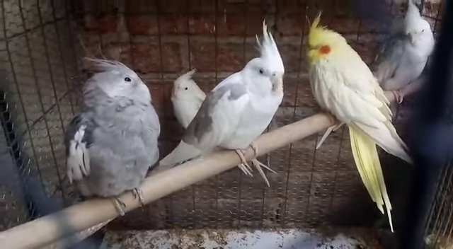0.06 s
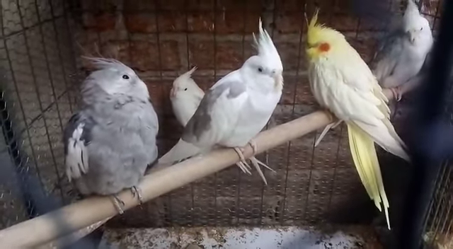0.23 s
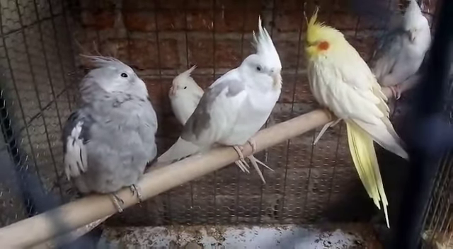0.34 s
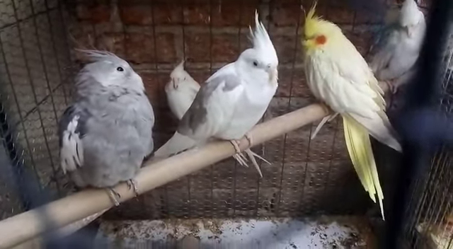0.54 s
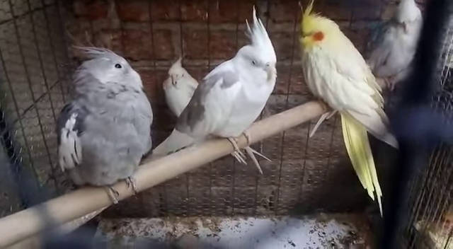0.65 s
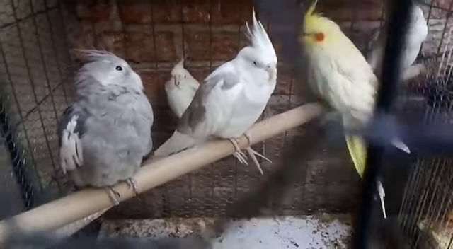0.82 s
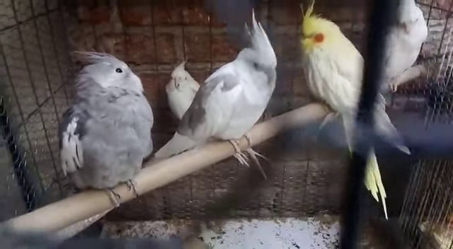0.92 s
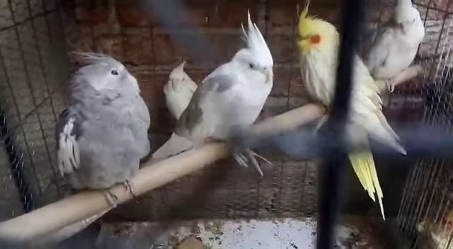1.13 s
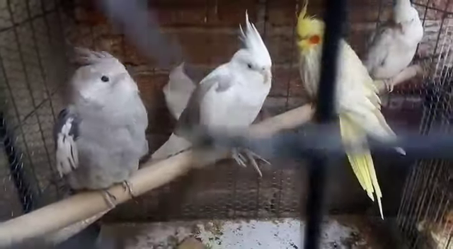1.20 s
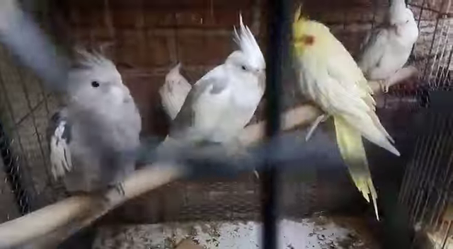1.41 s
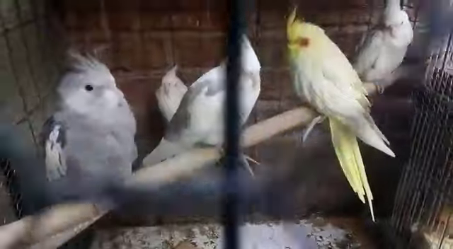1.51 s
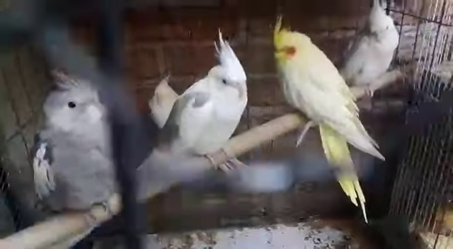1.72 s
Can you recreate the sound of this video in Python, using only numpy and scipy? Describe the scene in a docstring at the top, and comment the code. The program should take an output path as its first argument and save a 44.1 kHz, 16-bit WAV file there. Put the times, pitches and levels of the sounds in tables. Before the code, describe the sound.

Faint distant bird calls fade as a near caged bird begins short sharp chirps, growing louder and evenly spaced, then stopping; two soft wooden taps follow over quiet hum, with a short bright room ring.

```python
"""A brick room of caged cockatiels: a small bird close by gives a quick run of chirps.
Each chirp opens on a raspy low note, then breaks into a loud, warbling whistle, both built from harmonics.
Farther birds swoop down onto held notes, and light taps ring the modes of a perch.
Shaped noise and two low sines make the room noise and hum; wall echoes and decaying noise make the room."""
import sys
import numpy as np
from scipy import signal
from scipy.fft import rfft, irfft
from scipy.io import wavfile

SR = 44100
rng = np.random.default_rng(int(sys.argv[2]) if len(sys.argv) > 2 else 0)


def int16_out(signal):
    """Quantize to a 16-bit WAV file."""
    q = np.round(np.clip(np.atleast_2d(signal).T, -1, 1) * 32767)
    wavfile.write(sys.argv[1], SR, q.astype(np.int16))


N = 77175

# Room noise colour: (frequency [Hz], relative density [dB per Hz])
AIR_COLOUR = [(25, -15), (70, 9), (110, 3.5), (170, -5), (400, -7.5), (800, -9.5), (1500, -18.5),
              (3000, -5.5), (6500, -10), (7600, -49), (16000, -46)]
# Level ride of room noise and hum: (time [s], level [dB])
AIR_LEVEL = [(0, -54), (.25, -53.5), (.55, -51), (.75, -54), (1.25, -57.5), (1.42, -56.5), (1.58, -50.5),
             (1.75, -46.5)]
# Low hum: (frequency [Hz], level relative to the room noise [dB])
HUM = [(71, -9), (108, -10)]
# Farther birds, each call swooping down onto a held note: (time [s], length [s], from [Hz], to [Hz],
#   level [dB], first overtone [dB], pitch scatter [fraction of pitch])
FAR_CALLS = [ (-.02, 0.11, 3500, 3397, -36.5, -35, 0.02), (-.05, 0.087, 2875, 2550, -35, -25.5, 0.14),
             (-.03, 0.15, 2538, 2119, -50, -38, 0.14), (1.018, 0.083, 1292, 1112, -52, -33, 0.07),
             (1.047, 0.033, 1855, 1662, -44.5, -31, .04), (1.467, 0.057, 1984, 1002, -49.5, -6, 0.1),
             (1.624, 0.075, 2716, 1674, -51.5, 13.5, 0.05), (1.643, 0.052, 5050, 4400, -35.5, -23, .08), ]
# Decay of the room ring: (frequency [Hz], t60 [s])
ROOM_T60 = [(500, 0.79), (2500, 0.62), (5500, 0.3), (9000, 0.47), (15000, 0.06)]
# Colour of the room ring: (frequency [Hz], level [dB])
ROOM_COLOUR = [(700, 3), (1800, 1.5), (2800, -3.5), (4000, 2.5), (5500, -3), (8000, 0), (11000, -3.5),
               (15000, 1)]
# Near walls: (delay [s], level [dB])
ECHOES = [(.0034, -12), (.0079, -15), (0.0119, -15.5)]
# Near bird's chirps: (time of the break [s], low note length [s], whistle length [s], opening hook [Hz],
#   low note from [Hz], to [Hz], whistle from [Hz], to [Hz], warble period [s], low note [dB],
#   its swell [dB], whistle [dB], upper overtones [dB], rasp [0-1])
CHIRPS = [ (0.215, 0.015, 0.0059, 2009.5, 1610, 2876, 3880, 4130, 0.046, -18.5, 21, -27.5, -1.5, 0.12),
          (0.224, 0.0026, 0.011, -9.5, 3975, 4140, 5650, 6170, 0.038, -23.5, -9, -20, 3, 0.26),
          (0.312, 0.032, 0.0089, 7, 3386, 4140, 5720, 5560, 0.0065, -19, 9.5, -25, 0, 0.15),
          (0.384, 0.014, 0.011, 1996, 1681, 2073, 3590, 3554, 0.089, -30, -1.5, -20, -8.5, 0.39),
          (0.393, 0.0037, 0.011, -4, 3580, 4100, 5740, 5150, 0.04, -44, 7, -29, 21.5, 0.5),
          (.473, 0.012, 0.027, 1905, 1872, 2200, 3543, 4290, 0.07, -25.5, 2.5, -19.5, 1, 0.18),
          (.559, 0.016, 0.0062, 303, 2214, 2603, 3310, 3380, 0.043, -18, 7, -13, -0.5, 0.1),
          (0.564, 0.0025, .012, -11, 3487, 3450, 5090, 5680, 0.017, -22, 8, -12, 0.5, 0.68),
          (0.595, .017, 0.0221, 393.5, 3336, 3285, 5476, 4950, 0.0233, -24, -7.5, -12.5, -1.5, 0),
          (0.667, .029, 0.022, 306.5, 3095, 2783, 5695, 5460, .016, -15.5, 19.5, -11, -2.5, 0.05),
          (0.789, 0.023, .031, 2212, 2546, 2900, 5380, 5693, 0.0099, -16, 13.5, -10, -4.5, 0.36),
          (0.898, 0.015, 0.022, 697, 3007, 2728, 5396, 5603, 0.0093, -20, 1, -10.5, -4, 0.19),
          (1.005, 0.022, 0.026, -11, 2690, 2943, 5360, 5296, 0.013, -15, 14.5, -10, -3.5, 0.46),
          (1.112, 0.0166, .027, -1.5, 2410, 2800, 4655, 5572, .009, -16, 6, -10, -7, 0.08),
          (1.235, 0.027, 0.018, -9, 2438, 3220, 6420, 6480, 0.016, -41.5, -7, -22, -0.5, 0.89),
          (1.25, .002, 0.013, 12, 4940, 4800, 4640, 4660, .0095, -61, 10, -10, -6, 0.46),
          (1.35, 0.029, 0.016, -7, 2160, 3300, 4800, 5020, 0.015, -19, 5.5, -15, -4, 0.26),
          (1.459, .021, 0.015, -2.5, 2268, 2572, 4750, 5402, 0.0072, -17, 11, -12.5, 0.5, 0.36), ]
# Harmonics of the low note, from the fundamental up: (level [dB])
LOW_HARMONICS = [0.5, -4, -7, -8, -5.5, -7, -9]
# Harmonics of the whistle, from the fundamental up: (level [dB])
WHISTLE_HARMONICS = [-0.5, -8, -8.5, -35, -37, -25, -50]
# Resonance of throat and beak: (frequency [Hz], gain [dB])
THROAT = [(1500, -2.5), (2600, -4), (4000, 0), (5400, 3.5), (6500, 0.5), (8000, -19), (9700, -17.5),
          (11300, -21), (13300, -17.5), (15300, -12.5), (17000, -34)]
# Tiny rising squeaks around the chirps: (time of the peak [s], pitch there [Hz], level [dB])
SQUEAKS = [(.199, 4600, -33), (.216, 4530, -23), (0.592, 5530, -14), (.772, 4200, -19),
           (0.878, 4730, -27.5), (0.979, 4240, -29), (1.092, 4440, -25), (1.218, 2830, -17),
           (1.235, 4330, -15)]
# Light taps on the perch: (time [s], level [dB])
TAPS = [(1.553, -39), (1.593, -31)]
# Ringing modes of the perch: (frequency [Hz], level [dB], t60 [s])
PERCH_MODES = [(575, -13.5, 0.085), (1082, -4.5, 0.069), (1656, -1.5, .035), (2120, -9, 0.037),
               (5100, 7, .015)]

HUM_WAVER, HUM_WAVER_HZ = .3, 6   # spread, as a fraction of level and as radians of phase
ROOM_DB, ROOM_GAP_S = -7.5, 0.0019   # ring of the near sounds; its silent lead-in
SWOOP_S, FAR_EDGE_S = 0.013, .012
FAR_SCATTER_RATE_HZ, FAR_ROLLOFF_DB = 657, -9.5   # rolloff per overtone
ATTACK_S, RELEASE_S, BREAK_S = 0.001, 0.0013, 0.0012
HOOK_S = 0.00247   # the hook settles onto the low note
WARBLE_HZ, WARBLE_DECAY_S = 306, 0.02
WARBLE_DIP_DB = 4   # the whistle thins whenever its warble swings low
WHISTLE_SAG_DB = 5.5   # the whistle weakens after the break
BREAK_DIP_DB = 5   # the voice thins as it breaks
OVERTONES_FROM_HZ = 7040
OVERTONE_SWELL_DB = 8   # the upper overtones open up as the low note builds
RASP_SETTLE_S, RASP_HELD, BREAK_RASP = .007, .15, .5
RASP_JITTER, PITCH_JITTER, JITTER_RATE_HZ = .12, .011, 300   # jitter as a fraction of pitch
DOUBLING = .5   # strong and weak cycles alternate in the rasp
HISS_DB, HISS_TOP_HZ = -10, 7000
FLUTTER_DB, FLUTTER_HELD, FLUTTER_HZ = 4.5, .3, 160
SQUEAK_S, SQUEAK_RISE_HZ_PER_S = 0.0014, 250000
NEAR_LOW_CUT_HZ = 1640   # the near bird's sounds carry little below this
TAP_CONTACT_S = 0.0024
CUTOFF_HZ = 16100


def from_db(db):
    """Decibels to gain."""
    return 10 ** (np.asarray(db) / 20)


def rms_one(x):
    """Scale to an rms of 1."""
    return x / np.sqrt(np.mean(x ** 2) + 1e-20)


def at_hz(points, hz):
    """Read a table on a log-frequency axis."""
    f, v = np.transpose(points)
    return np.interp(np.log(np.maximum(hz, 1)), np.log(f), v)


def ramp(x):
    """Smooth step from 0 to 1."""
    return np.sin(np.pi / 2 * np.clip(x, 0, 1)) ** 2


def shaped_noise(gain, size=N):
    """Noise whose spectrum follows gain(Hz); rms 1."""
    hz = np.arange(size // 2 + 1) * SR / size
    return rms_one(irfft(rfft(rng.standard_normal(size)) * gain(hz), size))


def wander(rate_hz, size=N):
    """Random wavering, mostly below the given rate; spread 1."""
    return shaped_noise(lambda f: 1 / (1 + (f / rate_hz) ** 2), size=size)


def turn(hz):
    """Phase of an oscillator that follows a pitch curve."""
    return 2 * np.pi * np.cumsum(hz) / SR


def background(t):
    """Soft room noise and a wavering hum, rising and falling together."""
    air = shaped_noise(lambda f: from_db(at_hz(AIR_COLOUR, f)))
    hum = 0
    for hz, db in HUM:
        swell = 1 + HUM_WAVER * wander(HUM_WAVER_HZ)
        phase = 2 * np.pi * hz * t + HUM_WAVER * wander(HUM_WAVER_HZ)
        hum = hum + from_db(db) * np.sqrt(2) * swell * np.sin(phase)
    return from_db(np.interp(t, *np.transpose(AIR_LEVEL))) * (air + hum)


def room(x):
    """Diffuse ring of the room: bands of noise, each with its own colour and decay."""
    t, tail = np.arange(SR) / SR, 0
    edges = np.geomspace(200, 18000, 14)
    for low, high in zip(edges, edges[1:]):
        centre = np.sqrt(low * high)
        band_pass = signal.butter(2, [low, high], "band", fs=SR, output="sos")
        band = signal.sosfilt(band_pass, rng.standard_normal(SR))
        decay = np.exp(-np.log(1000) * t / at_hz(ROOM_T60, centre))
        tail = tail + from_db(at_hz(ROOM_COLOUR, centre)) * band * decay
    # a longer decay holds more energy, so scale by one t60
    tail = tail * ramp(t / ROOM_GAP_S - 1) * np.sqrt(2 * np.log(1000) / (SR * ROOM_T60[1][1]))
    return signal.fftconvolve(x, tail)[:len(x)]


def far_birds():
    """Falling calls from across the room, direct sound plus the room's ring."""
    lead = SR // 4   # lets calls and ring start before the scene opens
    t, out = np.arange(-lead, N) / SR, 0
    for s, length, from_hz, to_hz, db, overtone_db, scatter in FAR_CALLS:
        hz = to_hz + (from_hz - to_hz) * np.exp(-np.maximum(t - s, 0) / SWOOP_S)
        phase = turn(hz * (1 + scatter * wander(FAR_SCATTER_RATE_HZ, size=len(t))))
        voice = np.sin(phase)
        for k in range(3):
            voice = voice + from_db(overtone_db + FAR_ROLLOFF_DB * k) * np.sin((k + 2) * phase)
        gate = ramp((t - s) / FAR_EDGE_S) * ramp((s + length - t) / FAR_EDGE_S)
        out = out + from_db(db) * voice * gate
    return (out + room(out))[lead:]


def chirp(t, low_s, high_s, hook_hz, low_from, low_to, high_from, high_to, warble_s,
          low_db, swell_db, high_db, bright_db, rasp):
    """A low note, entered by a pitch hook, cracks into a warbling whistle at t = 0."""
    high = .5 + .5 * np.tanh(t / BREAK_S)   # crossfade from low note to whistle
    low = 1 - high
    after, age = np.maximum(t, 0), np.maximum(t + low_s, 0)
    early, late = np.clip(-t / low_s, 0, 1), np.clip(t / high_s, 0, 1)

    warble = np.sin(2 * np.pi * after / warble_s) * np.exp(-after / WARBLE_DECAY_S)
    low_hz = low_to + (low_from - low_to) * early + hook_hz * np.exp(-age / HOOK_S)
    high_hz = high_from + (high_to - high_from) * late + WARBLE_HZ * warble
    # roughest at the onset, with an extra crackle at the break
    onset_rasp = rasp * (RASP_HELD + rasp ** 2 + np.exp(-age / RASP_SETTLE_S))
    rough = low * (onset_rasp + BREAK_RASP * high)
    jitter = (RASP_JITTER * rough + PITCH_JITTER) * wander(JITTER_RATE_HZ, size=len(t))
    hz = (low * low_hz + high * high_hz) * np.exp(jitter)

    phase, voice = turn(hz), 0
    overtones_db = bright_db - OVERTONE_SWELL_DB * (early - .5) * low
    for k, (low_part, high_part) in enumerate(zip(LOW_HARMONICS, WHISTLE_HARMONICS), 1):
        upper = ramp(2 * (k * hz / OVERTONES_FROM_HZ - 1) + .5)
        db = low * low_part + high * high_part + at_hz(THROAT, k * hz) + overtones_db * upper
        voice = voice + from_db(db) * np.sin(k * phase) * (k * hz < SR / 2)
    voice = voice * (1 + DOUBLING * np.minimum(rough, 1) * np.sin(phase / 2))

    def breath_colour(f):
        """Throat resonance with soft cuts at both ends."""
        return from_db(at_hz(THROAT, f)) * ramp(f / THROAT[0][0] - .5) / (1 + (f / HISS_TOP_HZ) ** 2)

    hiss = shaped_noise(breath_colour, size=len(t))
    whistle_db = high_db - WHISTLE_SAG_DB * late + WARBLE_DIP_DB * np.minimum(warble, 0)
    level = low * (low_db - swell_db * early) + high * whistle_db
    flutter = FLUTTER_DB * (FLUTTER_HELD + np.minimum(rough, 1)) * wander(FLUTTER_HZ, size=len(t))
    level = level + flutter - BREAK_DIP_DB * 2 * low * high
    gate = ramp((t + low_s) / ATTACK_S + .5) * ramp((high_s - t) / RELEASE_S + .5)
    return (voice + from_db(HISS_DB) * rough * hiss) * from_db(level) * gate


def near_bird(t):
    """The run of chirps and tiny rising squeaks, thinned in the lows."""
    out = np.zeros(N)
    for s, *shape in CHIRPS:
        span = np.abs(t - s) < .06
        out[span] += chirp(t[span] - s, *shape)
    for s, hz, db in SQUEAKS:
        age = t - s
        swell = np.exp(-.5 * (age / SQUEAK_S) ** 2)
        out += from_db(db) * swell * np.sin(2 * np.pi * (hz + SQUEAK_RISE_HZ_PER_S * age / 2) * age)
    return signal.sosfilt(signal.butter(6, NEAR_LOW_CUT_HZ, "high", fs=SR, output="sos"), out)


def perch_taps(t):
    """Each tap briefly rings the modes of the wooden perch."""
    out = 0
    for s, db in TAPS:
        age = np.maximum(t - s, 0)
        for hz, mode_db, t60 in PERCH_MODES:
            ring = ramp(age / TAP_CONTACT_S) * np.exp(-np.log(1000) * age / t60)
            out = out + from_db(db + mode_db) * np.sin(2 * np.pi * hz * age) * ring
    return out


def wall_echoes(near):
    """Delayed, softer copies of the near sounds off the walls."""
    return sum(from_db(db) * np.pad(near, (int(abs(delay) * SR), 0))[:N] for delay, db in ECHOES)


def scene():
    """Near sounds with their wall echoes and room ring, far birds and background."""
    t = np.arange(N) / SR
    near = near_bird(t) + perch_taps(t)
    near_in_room = near + wall_echoes(near) + from_db(ROOM_DB) * room(near)
    return (near_in_room + far_birds() + background(t))[None]


def record(dry):
    """The top is cut steeply."""
    return signal.sosfilt(signal.ellip(10, .1, 80, CUTOFF_HZ, fs=SR, output="sos"), dry)


dry = scene()
out = record(dry)
int16_out(out)
```